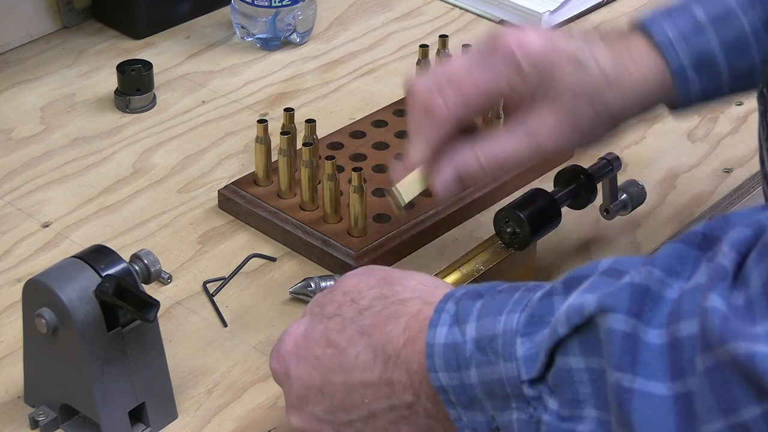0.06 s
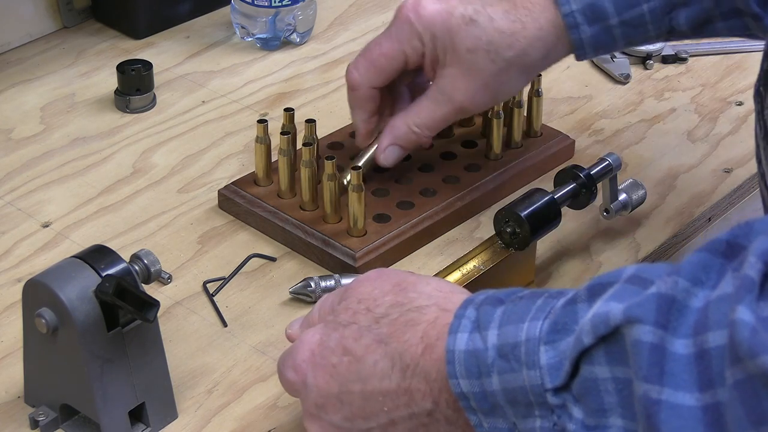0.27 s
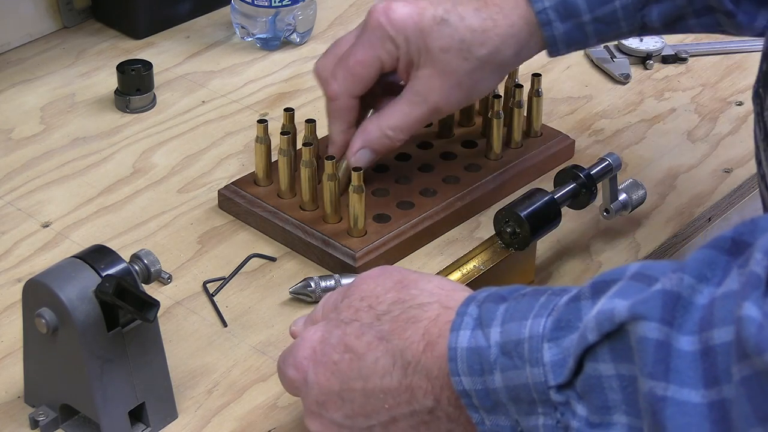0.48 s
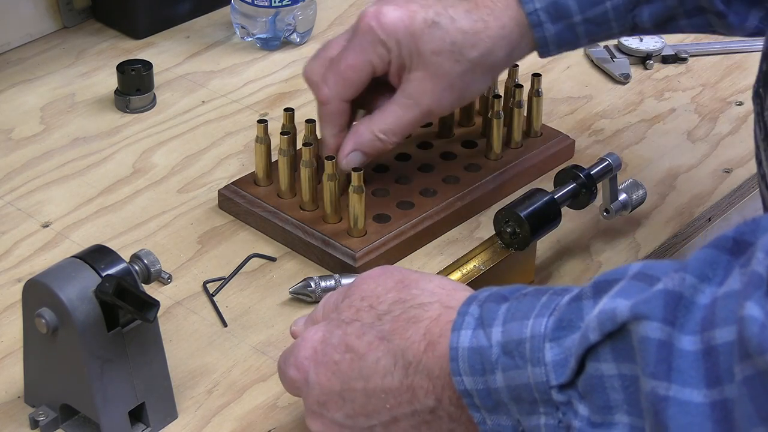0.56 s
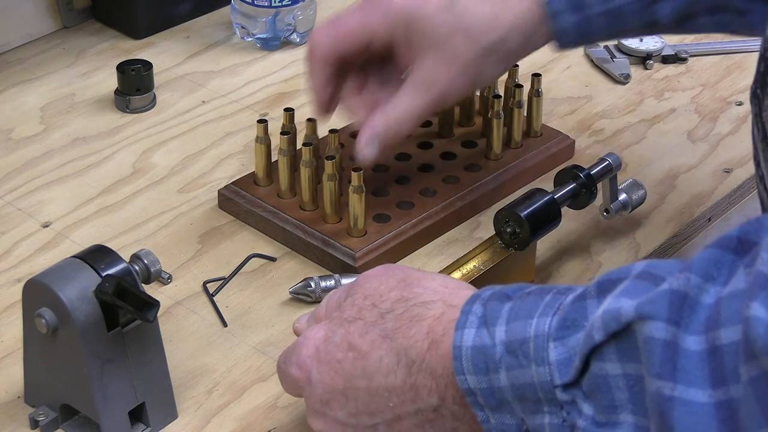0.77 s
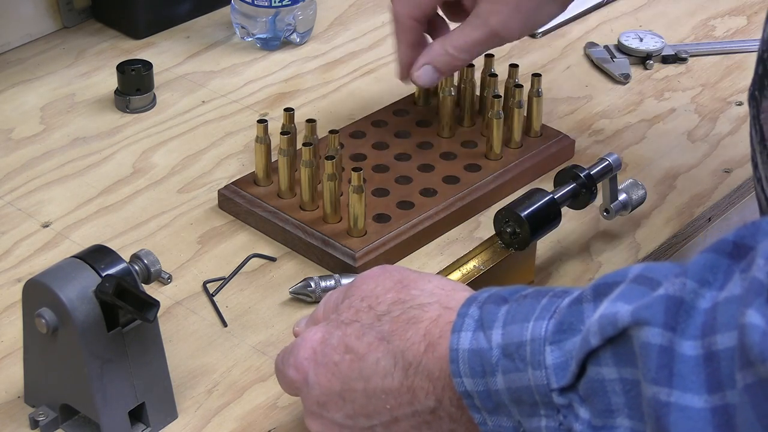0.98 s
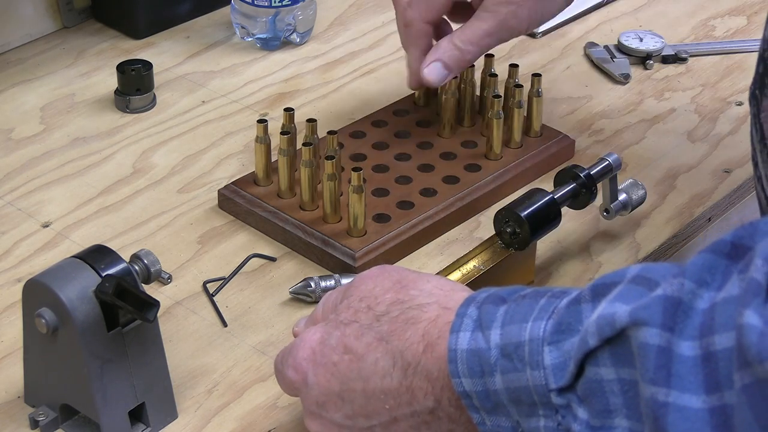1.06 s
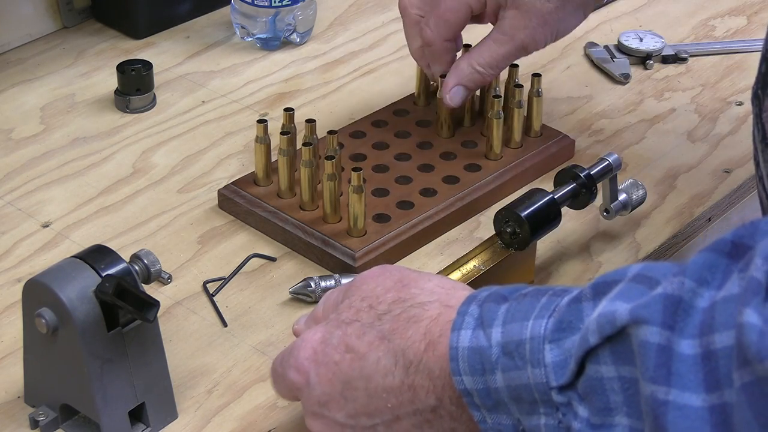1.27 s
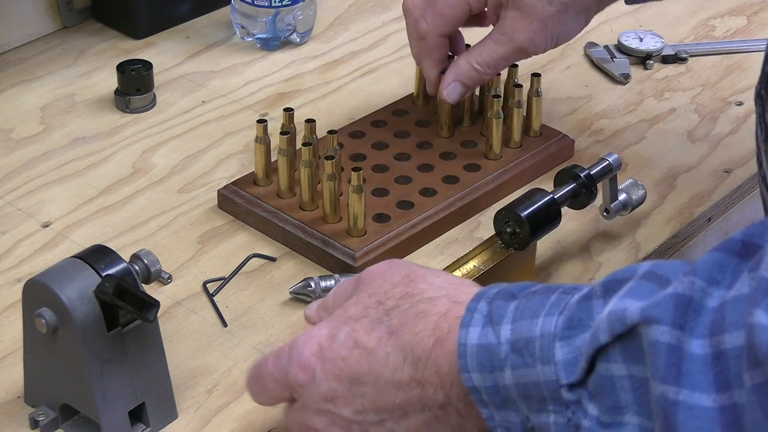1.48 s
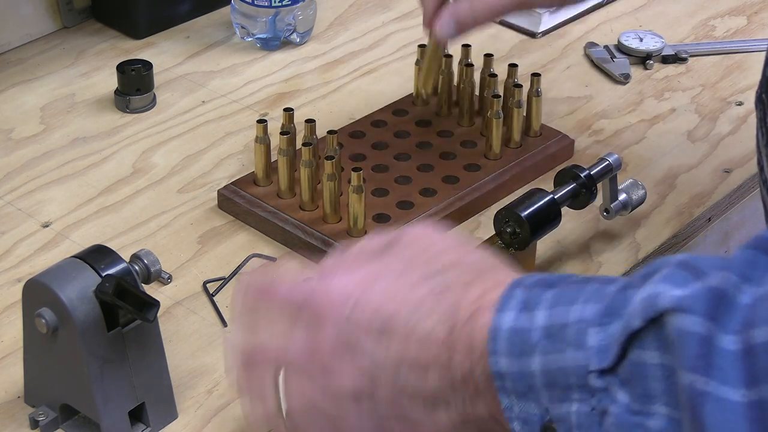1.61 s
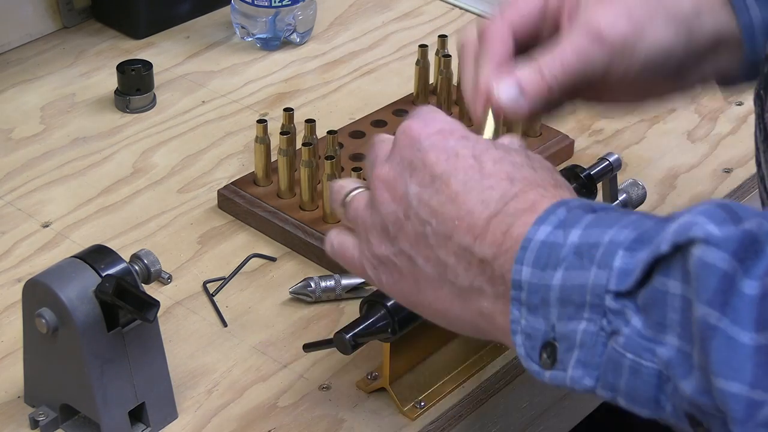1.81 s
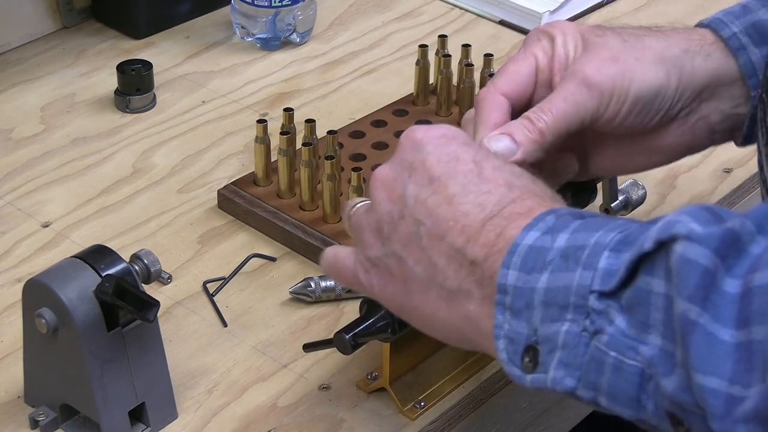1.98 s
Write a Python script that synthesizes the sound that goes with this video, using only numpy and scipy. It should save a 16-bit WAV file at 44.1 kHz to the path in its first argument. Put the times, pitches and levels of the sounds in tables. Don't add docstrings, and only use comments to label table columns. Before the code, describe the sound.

Empty brass cases handled at a wooden bench, first a loud ringing drop, then taps, seating, gripping clicks and a small rattle, with low air puffs, short room echo and steady quiet room tone.

```python
import sys
import numpy as np
from scipy import signal
from scipy.fft import rfft, irfft
from scipy.io import wavfile

SR = 44100
rng = np.random.default_rng(int(sys.argv[2]) if len(sys.argv) > 2 else 0)


def amplitude_ratio(level_db):
    exponent = np.asarray(level_db, float) / 20
    return 10 ** exponent


def wrap_up_sound(samples):
    columns = np.atleast_2d(samples).T
    tamed = np.clip(columns, -1, 1)
    steps = np.round(tamed * 32767).astype(np.int16)
    wavfile.write(sys.argv[1], SR, steps)


N = 90404
LEAD = 4410

# pitch_hz, level_db [dB per Hz]
ROOM_TONE = [(15, -24.5), (25, 4), (59, 0), (503, 3), (641, -3), (1290, -14), (1700, -20), (4030, -23),
             (16000, -32.5)]
# time_s, level_db
DRAUGHT = [(0, -67.5), (1.05, -95), (1.15, -46.5), (1.42, -51.5), (1.468, -56), (1.65, -48), (1.701, -65),
           (1.8, -56), (1.93, -52), (2.05, -98)]
# start_s, peak_db, swing_hz, swings [count]
ARM_PUFFS = [(1.138, -44, 51.4, 5.5), (1.15, -27.5, 121, 2.75), (1.193, -33.5, 116, 4.5),
             (1.226, -33.5, 70, 2.5), (1.268, -36, 83, 3.7), (1.307, -29.5, 76.6, 3.5),
             (1.315, -37, 128, 2.9), (1.331, -34.5, 127.7, 5.3), (1.353, -32.5, 110.2, 4.1),
             (1.357, -34.5, 126, 1.8), (1.367, -51, 105, 3.2), (1.372, -30, 92, 2.2), (1.505, -38, 104, 3),
             (1.548, -36.5, 94, 3.65), (1.556, -38, 180, 4), (1.585, -36.5, 92, 1.7),
             (1.61, -41.5, 110, 4.4), (1.71, -35.5, 103, 2.8), (1.714, -32.5, 65, 4.3),
             (1.743, -35, 119, 3.2), (1.748, -41, 55.7, 3.5), (1.756, -45.5, 146, 7.7)]
# start_s, peak_db, swing_hz, swings [count]
BENCH_THUDS = [
    (0.224, -45, 140, 5.6),
    (.565, -46, 168.4, 5.2),
    (0.819, -44.5, 133, 5.5),
    (0.901, -52.5, 150, 4.7),
    (1.064, -42, 185, 6.3),
    (1.858, -41.5, 87, 2.2),
]
# delay_s, level_db
ECHOES = [(.003, -2), (.0055, -28), (.0085, -33.5), (.016, -22), (.027, -21.5), (0.043, -21.5)]
# pitch_hz, t60_s
TAIL_DECAY = [(150, 1), (400, 0.27), (1000, 0.63), (2200, 0.44), (4500, 0.43), (9000, 0.39), (14000, 0.073)]
# pitch_hz, level_db
TAIL_COLOUR = [(150, 7), (500, 1), (2000, -0.5), (5000, -7), (14000, -2)]
# start_s, length_s, level_db, pitch_hz, width_hz
SLIDES = [(0.7044, 0.0045, -50.5, 4200, 348), (0.729, 0.019, -67, 4320, 150),
          (1.559, 0.038, -65, 10030, 504), (1.613, 0.03, -62, 3480, 4970),
          (1.914, 0.079, -67.5, 4300, 2000), (1.916, 0.039, -58.5, 992, 199)]
# start_s, mode pitches [pitch_hz]
RING_PITCHES = [
    (.2225, (9784, 9817, 9736, 9066, 12483, 12513)),
    (.741, (9775,)),
    (.7605, (9770, 9874, 10155, 9017, 12444, 8216, 15665)),
    (1.0715, (9920, 9760, 9179, 9060, 12587, 12759, 8135, 15710, 4440)),
    (1.229, (9782, 9905, 9085, 9136, 12526, 11809, 4422, 4462)),
    (1.448, (9790, 9850)),
    (1.4745, (9065, 3936, 3285, 2022)),
    (1.575, (9950,)),
]
# level_db, t60_s, rise_s
RING_MODES = [
    [(-19, 0.13, 0.00194), (-17.5, 0.083, 0.00067), (-36.5, 0.44, 0.0018), (-33, 0.62, 0.02),
     (-56, 0.324, .004), (-46, 0.43, .004)],
    [(-64, 0.33, .004)],
    [(-58, 0.27, .003), (-70, .3, .003), (-72, 0.18, .003), (-48, 0.29, 0.011), (-51, 0.14, .002),
     (-60, .2, .002), (-77, .3, .003)],
    [(-62, 0.2, .002), (-55, 0.22, .002), (-43, 0.092, 0.0023), (-46, 0.085, .003), (-68, .25, .003),
     (-72, .2, .003), (-66, 0.28, .002), (-77, 0.27, .003), (-53, 0.79, .004)],
    [(-57, 0.12, 0.0018), (-59, 0.14, 0.0018), (-62, .3, .003), (-69, .3, .003), (-60, 0.12, .002),
     (-78, .3, .003), (-53, 0.27, 0.0023), (-77, 0.36, 0.0023)],
    [(-61, 0.33, .004), (-74, .3, 0.0032)],
    [(-72, 0.69, .004), (-74, .4, 0.0022), (-73, .3, .002), (-50, .3, .002)],
    [(-72, .3, 0.0035)],
]

# pitch_hz, width_hz, level_db
EARLIER = [
    (-0.062, -9, 21000),
]
EARLIER_BODY = [(418.4, 520, 0), (734.4, 71, 2), (1000, 71, -40.5), (3640, 600, -9), (6500, 1500, -21),
                (9320, 320, -14.5)]
DROPS = [
    (.2224, -14.5, 11998.5),
    (.2250, -17, 4997.5),
    (.2275, -20.5, 3998),
]
DROP_BODY = [(545, 95, 4.5), (600, 110, -1), (765, 216, -11.5), (1316, 160, -6), (1800, 180, -3.5),
             (2160, 500, -8), (3254, 150, -8), (4300, 240, -8), (5500, 600, -18), (8030, 900, -15.5)]
NUDGES = [
    (.394, -24, 3300),
    (.5197, -41, 2500),
    (.5332, -39.5, 8700),
    (.5606, -38.5, 4360),
    (.5745, -38, 4400),
]
NUDGE_BODY = [(607, 150, -2.5), (1330, 300, -7), (1865, 82, -4), (2090, 260, -12), (3500, 200, -50),
              (4300, 220, -48)]
SEATS = [
    (.8218, -28, 5500),
    (.8245, -22.5, 1500),
]
SEAT_BODY = [(536, 95, 3.5), (646, 85, -8), (1274, 170, -4.5), (1920, 220, -1), (2450, 260, -12),
             (6000, 590, -25)]
TAPS = [
    (.7557, -27.5, 6020),
    (.7592, -16.5, 6900),
]
TAP_BODY = [(1100, 180, 0.5), (1500, 170, -26), (2040, 152, 13.5), (2500, 140, 7.5), (3436, 400, 11.5),
            (4570, 230, 10.5), (5540, 240, -4.5), (7700, 210, -36)]
GRIPS = [
    (1.050, -43, 1800),
    (1.0553, -25, 5800),
    (1.059, -28.5, 3640),
    (1.0612, -27.5, 4840),
    (1.0711, -18.5, 7160),
    (1.0742, -29.5, 6360),
    (1.0778, -27.5, 6000),
]
GRIP_BODY = [(554, 360, 5), (930, 360, 5.5), (1480, 260, -7.5), (1698, 150, 5), (2080, 900, 0.5),
             (3200, 440, 3), (3950, 230, 4), (4520, 120, 7.5), (6620, 86, -7.5)]
TUGS = [
    (.7038, -33, 4960),
    (1.2255, -24.5, 4860),
    (1.2275, -31, 5500),
    (1.229, -27, 6000),
    (1.2308, -21.5, 5250),
    (1.2345, -40.5, 4930),
    (1.261, -55, 4950),
]
TUG_BODY = [(636, 320, 2), (1200, 230, 0), (2200, 670, -5), (2690, 190, -4), (3270, 260, -5.5),
            (3860, 420, -1), (4427, 75, 6), (5500, 140, -31)]
TILTS = [
    (1.4743, -29, 4000),
    (1.479, -35.5, 3500),
    (1.4825, -33.5, 4000),
    (1.502, -43, 4000),
]
TILT_BODY = [(730, 100, 3), (1110, 61, -13), (2010, 560, 4.5), (3280, 130, 8.5), (3930, 440, 2),
             (4970, 360, -18)]
LIFTS = [
    (1.6325, -33, 6500),
    (1.638, -33, 3930),
    (1.645, -50, 3500),
    (1.923, -56, 3000),
]
LIFT_BODY = [(1010, 175, 5.5), (1310, 230, 1), (2220, 120, 1.5), (2840, 230, -11.5), (3500, 260, -8),
             (4050, 130, -0.5), (5440, 160, -11)]


def evened(x):
    return x / np.sqrt(np.mean(x ** 2) + 1e-20)


def read(points, hz):
    f, value = np.transpose(points)
    return np.interp(np.log(hz + 1), np.log(f + 1), value)


def add(mix, start_s, sound):
    part = mix[LEAD + round(start_s * SR):][:len(sound)]
    part += sound[:len(part)]


def coloured(points):
    spectrum = rfft(rng.standard_normal(N))
    return evened(irfft(spectrum * amplitude_ratio(read(points, np.fft.rfftfreq(N, 1 / SR))), N))


def room_tone():
    return amplitude_ratio(-54) * coloured(ROOM_TONE)


def moving_air():
    puffs = np.zeros(N + LEAD)
    for start_s, peak_db, swing_hz, swings in ARM_PUFFS + BENCH_THUDS:
        t = np.arange(round(swings / swing_hz * SR)) / SR
        swing = np.sin(2 * np.pi * (swing_hz * t + rng.random()))
        add(puffs, start_s, amplitude_ratio(peak_db) * np.hanning(len(t)) * swing)
    time_s, level_db = np.transpose(DRAUGHT)
    strength = amplitude_ratio(np.interp(np.arange(N) / SR, time_s, level_db))
    return puffs[LEAD:] + strength * coloured([(20, -13), (60, -3.5), (130, -5), (260, -12.5), (600, -80)])


def workshop():
    early = np.zeros(SR)
    early[0] = 1
    for delay_s, level_db in ECHOES:
        spread_s = 0.11 * delay_s
        scatter = rng.standard_normal(1000) * np.exp(-np.arange(1000) / SR / spread_s)
        early[round(delay_s * SR):][:1000] += amplitude_ratio(level_db) * scatter / np.linalg.norm(scatter)
    hz, t, z = signal.stft(rng.standard_normal(SR), SR, nperseg=256)
    decay_db = 60 * t / read(TAIL_DECAY, hz)[:, None]
    level_db = read(TAIL_COLOUR, hz)[:, None] - decay_db
    tail = signal.istft(z * amplitude_ratio(level_db), SR, nperseg=256)[1][:SR]
    tail_start_s = 0.0052
    tail = tail * np.clip(np.arange(SR) / SR / tail_start_s - 1, 0, 1)
    return early, tail / np.linalg.norm(tail)


def finger_slides(size):
    out = np.zeros(size)
    for start_s, length_s, level_db, pitch_hz, width_hz in SLIDES:
        scrape = rng.standard_normal(9000)[:round(length_s * SR)]
        r = np.exp(-np.pi * width_hz / SR)
        poles = [1, -2 * r * np.cos(2 * np.pi * pitch_hz / SR), r * r]
        for _ in range(2):
            scrape = signal.lfilter([1, 0, -1], poles, scrape)
        add(out, start_s, amplitude_ratio(level_db) * evened(scrape) * np.hanning(len(scrape)) ** 0.15)
    return out


def brass_rings(size):
    t, out = np.arange(SR) / SR, np.zeros(size)
    for (start_s, pitches), modes in zip(RING_PITCHES, RING_MODES):
        for pitch_hz, (level_db, t60_s, rise_s) in zip(pitches, modes):
            envelope = amplitude_ratio(level_db - 60 * t / t60_s) * (1 - np.exp(-t / rise_s))
            add(out, start_s, envelope * np.sin(2 * np.pi * pitch_hz * t))
    return out


def struck_body(body, widening, t):
    out = np.zeros(len(t))
    for k, (pitch_hz, width_hz, level_db) in enumerate(body):
        width_hz = max(width_hz, 110)
        gain = (-1) ** k * amplitude_ratio(level_db) * width_hz
        decay = np.exp(-np.pi * widening * width_hz * t)
        out += gain * decay * np.sin(2 * np.pi * pitch_hz * t)
    return evened(out)


def contacts(size, hits, body):
    length = 3000
    t, out = np.arange(length) / SR, np.zeros((2, size))
    crack_s, crack_hz, crack_db = 0.0062, 3000, -11
    chatter_s, chatter_hz, chatter_db, grit_db = 0.0026, 1580, -1, -4
    click, grit_fade = signal.lfilter(*signal.butter(1, crack_hz, fs=SR), [t == 0, np.exp(-t / crack_s)])
    crack = amplitude_ratio(crack_db) * evened(click)
    clean = struck_body(body, 1, t) + crack
    to_room = struck_body(body, 1.9, t) + crack
    bright = signal.lfilter(*signal.butter(1, chatter_hz, "high", fs=SR), clean)
    small_body = signal.butter(3, 420, "high", fs=SR, output="sos")
    for start_s, peak_db, hardness_hz in hits:
        z, grit = rng.standard_normal((2, length))
        touches = z * (abs(z) > 1.5)
        chatter = amplitude_ratio(chatter_db) * touches * np.exp(-t / chatter_s) / 4
        near = clean + signal.fftconvolve(chatter, bright)[:length]
        near = near + amplitude_ratio(grit_db) * evened(grit * grit_fade)
        hardness = signal.butter(3, min(hardness_hz, SR / 2.2), fs=SR)
        both = signal.lfilter(*hardness, [near, to_room])
        both = signal.sosfilt(small_body, both)
        match = np.std(both[0]) / np.std(both[1])
        both = both * [[1], [match]] * amplitude_ratio(peak_db) / abs(both[0]).max()
        add(out[0], start_s, both[0])
        add(out[1], start_s, both[1])
    return out


def scene():
    n = N + LEAD
    tail_db, ring_tail_db = -5.5, -16.5
    brass = brass_rings(n)
    heard = brass + amplitude_ratio(ring_tail_db) * signal.fftconvolve(brass, workshop()[1])[:n]
    kinds = [(EARLIER, EARLIER_BODY), (DROPS, DROP_BODY), (NUDGES, NUDGE_BODY), (SEATS, SEAT_BODY),
             (TAPS, TAP_BODY), (GRIPS, GRIP_BODY), (TUGS, TUG_BODY), (TILTS, TILT_BODY), (LIFTS, LIFT_BODY)]
    spots = [finger_slides(n) * np.ones((2, 1))]
    spots += [contacts(n, hits, body) for hits, body in kinds]
    for near_and_room in spots:
        early, tail = workshop()
        answers = [early, amplitude_ratio(tail_db) * tail]
        heard = heard + signal.fftconvolve(near_and_room, answers, axes=1)[:, :n].sum(0)
    return (heard[LEAD:] + moving_air() + room_tone())[None]


def low_pass(x):
    return signal.sosfilt(signal.butter(12, 16390, fs=SR, output="sos"), x)


def record(dry):
    edge_hz = 15900
    band_limit = signal.firwin(401, edge_hz, window=("kaiser", 9), fs=SR)
    mix = signal.oaconvolve(dry, band_limit[None], "same")
    return low_pass(mix)


dry = scene()
out = record(dry)
wrap_up_sound(out)
```